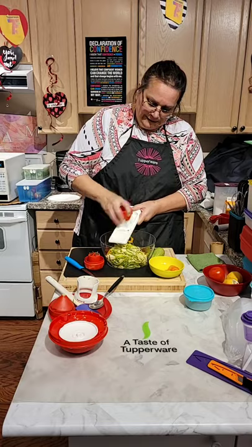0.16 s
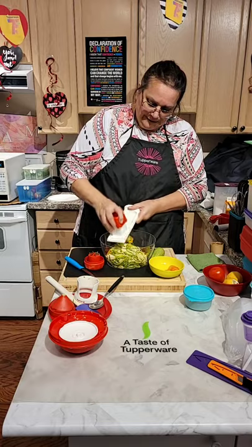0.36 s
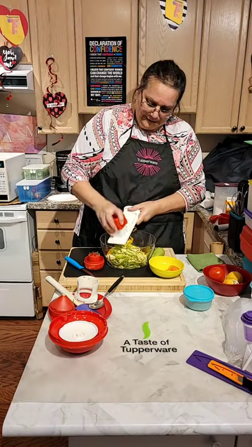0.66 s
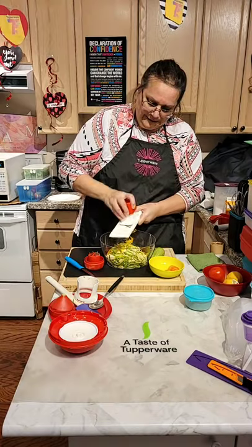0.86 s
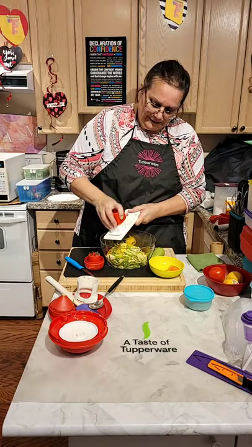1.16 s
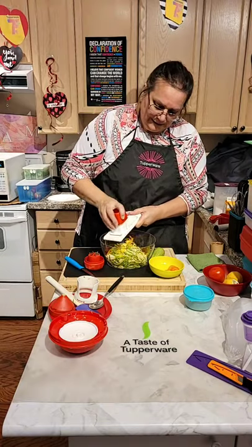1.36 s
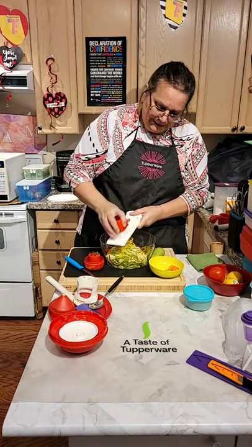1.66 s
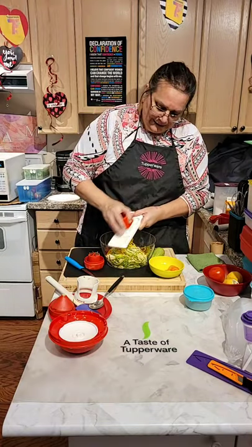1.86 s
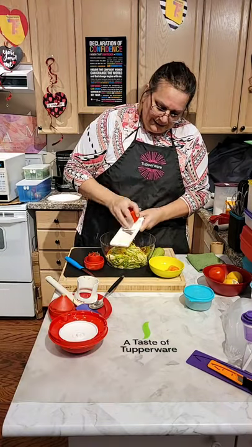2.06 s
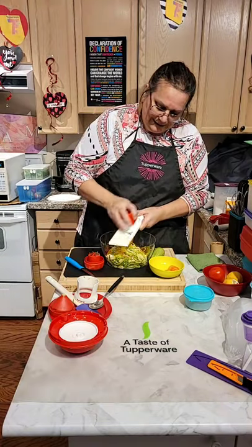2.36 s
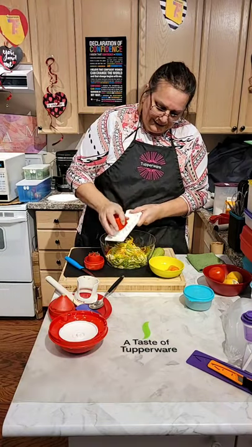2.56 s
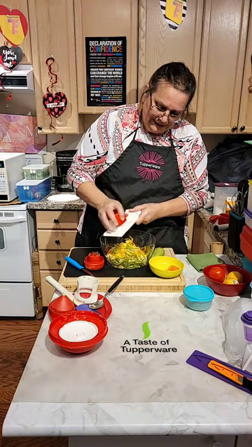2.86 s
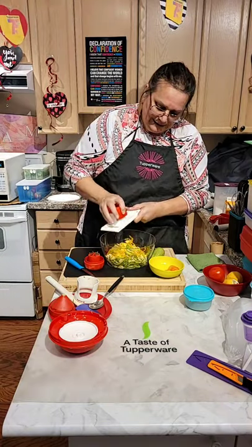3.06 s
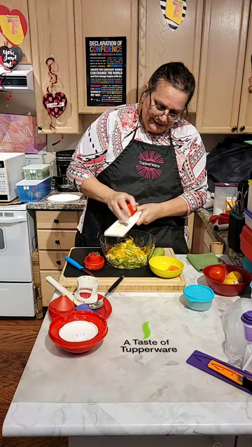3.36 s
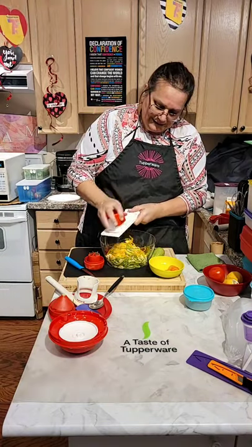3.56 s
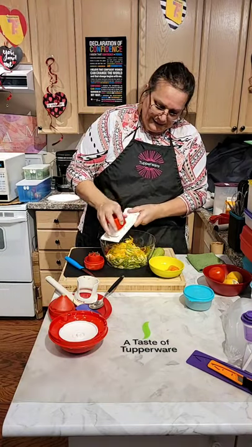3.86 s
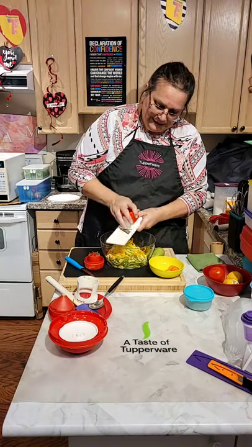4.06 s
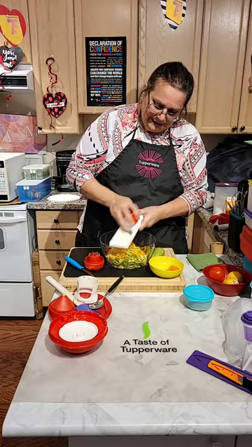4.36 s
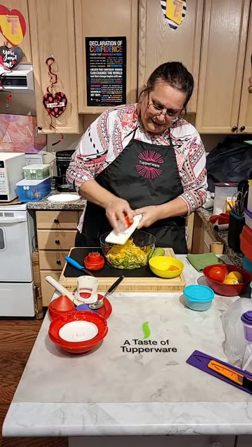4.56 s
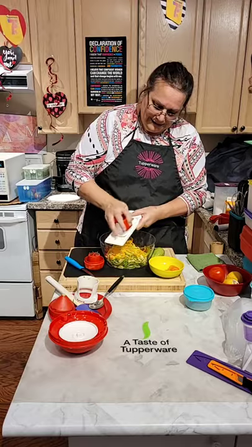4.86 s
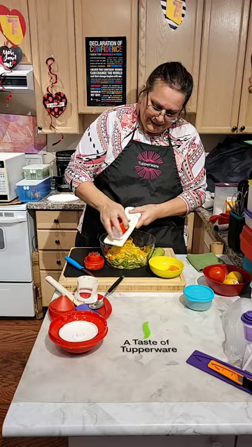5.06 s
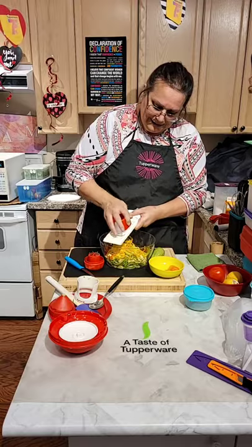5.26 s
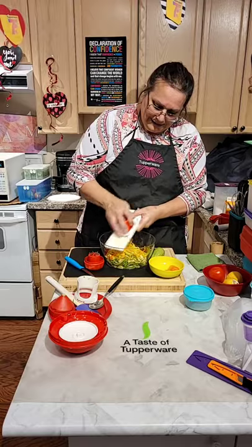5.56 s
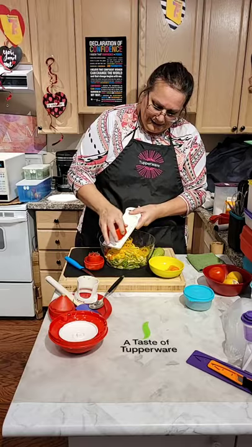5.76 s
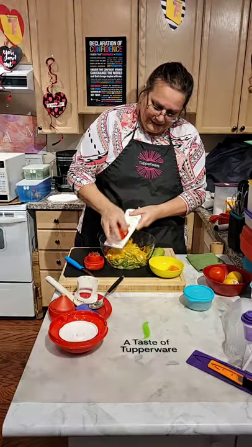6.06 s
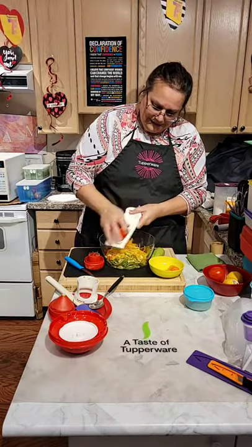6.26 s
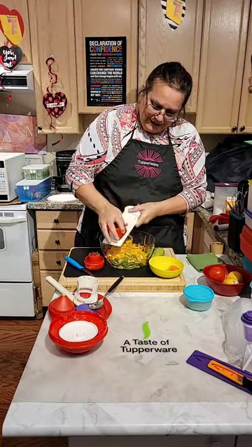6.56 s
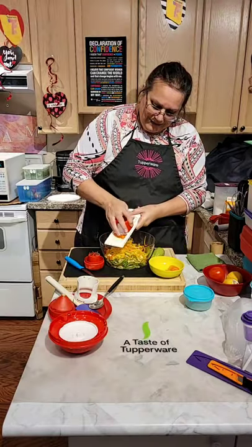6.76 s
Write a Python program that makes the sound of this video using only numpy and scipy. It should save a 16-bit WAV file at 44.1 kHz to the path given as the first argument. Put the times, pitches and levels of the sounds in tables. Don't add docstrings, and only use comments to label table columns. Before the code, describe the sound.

In a small hard kitchen, a hand guard clicks and rasps along a plastic slicer in uneven bursts, with tiny ticks and wet squeaks.

```python
import sys
import numpy as np
from scipy import signal
from scipy.fft import rfft, irfft
from scipy.io import wavfile
from scipy.ndimage import uniform_filter1d

SR = 44100
rng = np.random.default_rng(int(sys.argv[2]) if len(sys.argv) > 2 else 0)


def field_ratio(decibels):
    return 10 ** (np.asarray(decibels, dtype=float) / 20)


def store_wav(level_fs):
    pcm = np.round(np.clip(np.atleast_2d(level_fs), -1, 1) * 32767)
    wavfile.write(sys.argv[1], SR, pcm.T.astype(np.int16))


N = 304710


def evened(x):
    return x / np.sqrt(np.mean(x ** 2) + 1e-20)


def peaked(x):
    return x / abs(x).max()


def read(points, hz):
    f, value = np.transpose(points)
    return np.interp(np.log(hz + 1), np.log(f + 1), value)


def add(mix, s, sound):
    part = mix[round(s * SR):][:len(sound)]
    part += sound[:len(part)]


def play(table, source, places=1):
    mix = np.zeros((places, N))
    for k, (s, *settings) in enumerate(table):
        add(mix[k % places], s, source(*settings))
    return mix


def resonate(x, hz, width):
    return signal.lfilter(*signal.iirpeak(min(hz, SR / 2 - width), hz / width, SR), x)


def steep(x, hz, width):
    return resonate(resonate(x, hz, width), hz, width)


# (frequency [Hz], likeness [0-1])
LIKENESS = [(40, 0.92), (250, 0.26), (500, 0.75), (1000, 0.12), (16000, 0.042)]


def noise(colour, patchy_db):
    hz = np.fft.rfftfreq(1024, 1 / SR)
    a, b, c, d, patches = rng.standard_normal((N // 256 + 5, 513, 5)).T
    patches = uniform_filter1d(patches, size=12, axis=0)
    patches = evened(uniform_filter1d(patches, size=8, axis=1))
    same = np.clip(read(LIKENESS, hz), -1, 1)[:, None]
    left = a + 1j * b
    right = same * left + np.sqrt(1 - same ** 2) * (c + 1j * d)
    z = np.array([left, right]) * field_ratio(read(colour, hz)[:, None] + patchy_db * patches)
    return evened(signal.istft(z, nperseg=1024, noverlap=768)[1][:, :N])


# (frequency [Hz], width [Hz], level [dB])
HUM_LINES = [(49.6, 16, -63), (119.7, 5.1, -62.5), (143.4, 6.9, -59.5), (272.7, 10, -63)]
# (time [s], level [dB])
DRAUGHT = [(0, 11), (.5, 3), (1.45, 9), (1.7, 4), (2.6, 2), (4.3, 0.5), (4.9, -9), (5.75, 5.5), (6.2, -7),
           (6.9, 0)]
# (frequency [Hz], level per Hz [dB])
ROOM_AIR = [(15, -39), (25, -8), (140, -14.5), (250, -3), (373, -8), (850, -18.5), (2000, -26),
            (16000, -58.5)]


def refrigerator():
    lines = np.zeros((2, N))
    for k, (hz, width, db) in enumerate(HUM_LINES):
        p, q = rng.standard_normal((2, N))
        sides = (p + 0.067 * q, p - 0.29 * q)
        line = field_ratio(db) * np.array([evened(steep(x, hz, 2 * width)) for x in sides])
        if k == 0:
            line = line * field_ratio(np.interp(np.arange(N) / SR, *np.transpose(DRAUGHT)))
        lines += line
    waver = evened(uniform_filter1d(rng.standard_normal(N), size=SR // 3))
    motor_hz = 241.4 + 0.48 * waver
    motor = field_ratio(-50 + 0.27 * waver) * np.sin(2 * np.pi * np.cumsum(motor_hz) / SR)
    return motor + lines + field_ratio(-52.5) * noise(ROOM_AIR, patchy_db=-2.8)


# (start [s], length [s], pressure [dB], wetness [dB])
STROKES = [(0.128, 0.16, -36.5, -19.5), (0.289, 0.1, -29.5, -20), (0.407, .14, -36, -15),
           (0.594, 0.12, -34.5, -16), (0.763, 0.094, -36.5, -15.5), (0.896, 0.059, -28.5, -20),
           (0.975, 0.081, -41, -19), (1.39, .12, -38.5, -14.5), (1.552, 0.16, -32.5, -24),
           (1.726, 0.29, -36, -10), (1.903, 0.066, -27, -7.5), (1.994, 0.32, -35, -9.5),
           (2.341, 0.29, -35.5, -16.5), (2.649, .25, -34, -17.5), (3.269, 0.13, -34, -18),
           (3.4, 0.21, -36.5, -17.5), (3.995, 0.081, -35, -14.5), (4.092, 0.19, -32.5, -24),
           (4.283, 0.18, -33, -11.5), (4.57, 0.067, -35.5, -15), (4.68, 0.14, -35.5, -19),
           (4.854, 0.046, -38.5, -10), (5.036, 0.16, -46, -34), (5.15, 0.15, -47.5, -11.5),
           (5.415, 0.1, -45.5, -20), (5.554, 0.18, -30, -21.5), (5.812, 0.17, -34.5, -17),
           (5.94, 0.24, -32.5, -14.5), (6.21, 0.25, -34, -16), (6.487, .2, -36, -13)]
# (start [s], length [s], pressure [dB], wetness [dB])
RESTS = [
    (1.087, 0.29, -56.5, -21),
    (2.904, 0.346, -53, -11),
    (3.6, 0.4, -56, -14.5),
    (4.93, 0.11, -61, -19),
    (5.302, 0.14, -65.5, -19),
    (6.73, 0.34, -56.5, -21),
]


def strokes():
    press_s, press_shape, sag_db, lift_db_per_s = 0.054, 1.16, -4.5, 389
    t = np.arange(0, N / SR + .01, .002)
    sums = 1e-6
    for start, length, pressure_db, wet_db in STROKES + RESTS:
        along = np.clip((t - start) / length, 0, 1)
        lift_db = lift_db_per_s * np.maximum(t - start - length, 0)
        gain = np.clip((t - start) / press_s, 0, 1) ** press_shape
        gain = gain * field_ratio(pressure_db + sag_db * along - lift_db)
        sums = sums + np.array([gain, gain * field_ratio(wet_db), gain * along])
    pressure, wet, progress = sums
    ring_hz = (1360 + 79 * t) * (1 + 0.088 * progress / pressure)
    return (np.interp(np.arange(N) / SR, t, curve) for curve in (pressure, wet, ring_hz))


# (frequency [Hz], width [Hz], level [dB])
SLIDE_MODES = [(670, 1720, 5.5), (2060, 160, -20.5), (4200, 300, -1.5), (6500, 2800, -7)]
# (frequency [Hz], level per Hz [dB])
JUICE_HISS = [(1760, -16), (3000, -1), (4110, -3.5), (7300, -1), (9140, -13), (12400, 1), (15400, -7.5),
              (15800, -40)]


def scrape():
    pressure, wet, ring_hz = strokes()
    slips = rng.standard_normal(N) * field_ratio(3.5 * np.minimum(rng.exponential(1, N), 3.5))
    slips = slips * (rng.random(N) < 900 / SR)
    tremble = evened(resonate(rng.standard_normal(N), 31, 36))
    judder = field_ratio(5.5 * np.tanh(tremble))
    grains = slips * judder
    turn = np.exp(2j * np.pi * np.cumsum(ring_hz) / SR)
    r = np.exp(-np.pi * 320 / SR)
    body = 2 * (turn * signal.lfilter([1 - r], [1, -r], grains / turn)).real
    for hz, width, db in SLIDE_MODES:
        body = body + field_ratio(db) * steep(grains, hz, 2.6 * width)
    hiss = noise(JUICE_HISS, patchy_db=2.0) * judder ** 0.71
    return pressure * field_ratio(-9.5) * evened(body), wet * field_ratio(5.0) * hiss


def contact(seconds):
    u = np.arange(1024) / SR / seconds
    chatter = rng.standard_normal(1024)
    for _ in range(3):
        z = rfft(chatter * u * np.exp(-u))
        chatter = irfft(z / abs(z) ** .8)
    return chatter * np.exp(-u / 8) * np.minimum(u, 1)


def clack(blow_db, plate_hz, upper_hz, hard_db):
    hit = contact(0.001048)
    plate = steep(hit, plate_hz, 590) + 0.39 * steep(hit, 1764, 500)
    plate = plate + 0.22 * steep(hit, 1450, 330) + 0.89 * steep(hit, 2322, 2770)
    upper = 1.16 * resonate(hit, upper_hz, 500) + 0.42 * resonate(hit, 3670, 1800)
    upper = upper + .5 * resonate(hit, 5934, 2960)
    snap = resonate(hit, 11520, 3400)
    ring = plate + field_ratio(hard_db + 12.5) * upper + field_ratio(hard_db + 3.5) * snap
    ring = ring - 1.33 * resonate(ring, 1254, 180)
    return field_ratio(blow_db - 1.0) * peaked(ring)


def blow(s, blow_db, plate_hz, hard_db):
    upper_hz = 3633 + 103 * s + 45 * (hard_db + 15)
    sound = clack(blow_db, plate_hz, upper_hz * (1 + .03 * rng.uniform(-0.74, 1)), hard_db)
    patched = sound
    for hz in np.geomspace(1400, 8000, 7) * rng.uniform(.9, 1.1, 7):
        patched = patched + (field_ratio(4 * rng.uniform(-1.07, 1)) - 1) * resonate(sound, hz, .16 * hz)
    return abs(sound).max() * peaked(patched)


# (time [s], blow [dB], plate ring [Hz], hardness [dB])
CLACKS = [(0.212, -6, 1640, -14.5), (0.372, -7.5, 1480, -16.5), (0.676, -11, 1400, -19),
          (0.97, -5, 1490, -15), (1.64, -3.5, 1800, -14.5), (1.955, -5, 2150, -14),
          (2.105, -9.5, 1880, -16.5), (2.269, -14.5, 2250, -22.5), (2.436, -8, 2470, -14.5),
          (2.577, -8, 2590, -16.5), (2.742, -5, 1510, -14), (2.918, -17.5, 2100, -18),
          (3.358, -8, 1770, -12), (3.526, -10, 1860, -17), (4.083, -6.5, 1600, -13.5),
          (4.215, -4, 2230, -15), (4.355, -0.5, 1670, -14), (4.665, -9, 1850, -18),
          (4.799, -12.5, 2800, -14.5), (5.137, -10, 2330, -16), (5.49, -11.5, 1450, -18.5),
          (5.582, -21, 1490, -25), (5.636, -5, 2260, -9), (5.772, -6.5, 2330, -13.5),
          (5.9225, -2.5, 1860, -9), (6.05, -6.5, 1900, -16), (6.206, -8, 1820, -18.5),
          (6.319, -3.5, 2050, -15.5), (6.485, -12.5, 1870, -17.5), (6.598, -2.5, 2100, -22.5)]


def clacks():
    hits = np.zeros((3, N))
    for k, row in enumerate(CLACKS):
        add(hits[k % 3], row[0], blow(*row))
    return hits


def knock(blow_db, frame_hz):
    hit = contact(0.000698)
    spot = field_ratio(7.5 * rng.uniform(-1.35, 1, 3))
    modes = steep(hit, frame_hz, 323) + 0.29 * spot[0] * steep(hit, 390, 110)
    modes = modes + 0.54 * spot[1] * steep(hit, 667, 333) + 0.22 * spot[2] * steep(hit, 870, 210)
    return field_ratio(blow_db - 1.5) * peaked(signal.lfilter(*signal.butter(3, 320 / SR * 2, "high"), modes))


# (time [s], level [dB], frame mode [Hz])
KNOCKS = [(0.212, -19.5, 424), (0.372, -19, 486), (0.676, -20.5, 495), (0.97, -19, 484),
          (1.639, -15.5, 430), (1.956, -20, 477), (2.105, -18.5, 594), (2.268, -24, 835),
          (2.4365, -20, 540), (2.578, -19, 450), (2.741, -19, 470), (2.919, -35, 345), (3.359, -18.5, 407),
          (3.526, -20.5, 445), (4.082, -17.5, 473), (4.2145, -16.5, 468), (4.354, -21.5, 410),
          (4.665, -24, 610), (4.801, -20.5, 402), (5.136, -24, 386), (5.491, -33, 428), (5.582, -24.5, 695),
          (5.637, -18, 440), (5.772, -17.5, 457), (5.922, -20.5, 670), (6.049, -18, 375),
          (6.206, -25.5, 647), (6.319, -17.5, 480), (6.486, -30, 675), (6.599, -19, 480)]


def knocks():
    return play(KNOCKS, knock)[0]


def tick(blow_db, ring_hz):
    hit = contact(0.000874)
    ring = peaked(resonate(hit, ring_hz, 0.13 * ring_hz))
    crack = peaked(resonate(hit, 2500, 2900))
    return field_ratio(blow_db + 6.5) * peaked(ring + 0.49 * crack)


# (time [s], blow [dB], ring [Hz])
TICKS = [(0.314, -40, 400), (0.466, -40, 3500), (0.529, -42, 1990), (0.614, -41, 1530), (0.813, -42, 1540),
         (0.941, -34, 1830), (1.302, -54, 423), (1.404, -42, 1710), (1.572, -42, 1540), (1.781, -36, 1500),
         (2.404, -41, 2320), (2.516, -34, 1680), (3.133, -45, 600), (3.278, -50, 1500), (3.892, -52, 2080),
         (4.016, -45, 2130), (4.6, -43.5, 2000), (4.751, -34, 2200), (4.888, -38, 1900),
         (5.047, -45.5, 1500), (5.241, -46.5, 385), (5.408, -50.5, 581), (5.431, -42, 2240),
         (5.75, -36, 2040), (5.879, -39, 2050), (6.012, -36, 2130), (6.273, -39, 1900),
         (6.555, -30.5, 2140), (6.699, -33, 1980), (6.846, -47.5, 390)]
# (time [s], blow [dB], ring [Hz])
GRAZES = [
    (0.364, -27.5, 2300),
    (4.347, -42, 1480),
    (4.79, -32, 1740),
]


def ticks():
    return play(TICKS + GRAZES, tick, places=3)


def squeak(seconds, start_hz, end_hz, db):
    hz = np.linspace(start_hz, end_hz, round(seconds * SR))
    hz = hz + 40 * evened(uniform_filter1d(rng.standard_normal(len(hz)), size=150))
    grip = abs(evened(uniform_filter1d(rng.standard_normal(len(hz)), size=120)))
    tone = np.sin(2 * np.pi * np.cumsum(hz) / SR)
    return field_ratio(db + 4) * grip * tone * signal.windows.tukey(len(hz), .6)


# (time [s], length [s], start pitch [Hz], end pitch [Hz], level [dB])
SQUEAKS = [
    (0.41, 0.038, 3860, 3980, -56),
    (.452, 0.022, 3700, 3590, -46),
    (0.496, 0.042, 3960, 4170, -53),
    (1.7, 0.054, 4160, 4200, -66),
    (1.878, 0.008, 1970, 1940, -44),
    (3.888, 0.032, 2115, 2150, -59),
    (5.728, 0.025, 3970, 4020, -45),
    (5.784, 0.016, 4190, 4400, -31),
]


def squeaks():
    return play(SQUEAKS, squeak)[0]


# (time [s], level [dB], pitch [Hz], t60 [s])
THUMPS = [
    (1.939, -24, 213, 0.071),
    (1.944, -21, 342, 0.034),
    (1.948, -19, 102, 0.063),
    (4.203, -40, 126, 0.24),
    (4.258, -43, 80.5, 0.12),
]


def thump(db, hz, t60):
    t = np.arange(6000) / SR
    return field_ratio(db - 60 * t / t60) * np.sin(2 * np.pi * hz * t) * np.minimum(t / 0.0036, 1)


def thumps():
    return play(THUMPS, thump)[0]


# (frequency [Hz], t60 [s])
ROOM_T60 = [(300, 0.07), (500, 0.13), (800, 0.19), (2100, 0.2), (5500, 0.22), (14000, 0.15)]
# (delay [ms], gain [ratio])
ECHOES = [
    [(1.5, .4), (2.9, -.3), (6.3, .3), (8.4, -.14), (12.2, .16)],
    [(1.2, -.45), (2.4, .35), (3.5, .25), (6.9, .28), (13.1, -.15)],
]


def kitchen(x, tail_db, echo_db=0):
    taps = np.zeros((2, SR // 2))
    at = np.arange(160, SR // 2 - 20, 10)
    at = at + rng.integers(0, 10, (2, len(at)))
    np.put_along_axis(taps, at, rng.choice([-1., 1.], at.shape), 1)
    hz, t, z = signal.stft(taps, SR, nperseg=256)
    tail = signal.istft(z * field_ratio(-60 * t / read(ROOM_T60, hz)[:, None]), SR, nperseg=256)[1]
    tail *= np.clip(np.arange(tail.shape[1]) / SR / 0.0017, 0, 1)
    response = field_ratio(tail_db) * tail / np.linalg.norm(tail[0])
    response[:, 0] += 1
    for side, echoes in zip(response, ECHOES):
        for ms, gain in echoes:
            add(side, ms / 1000, np.array([gain * field_ratio(echo_db)]))
    bass = signal.filtfilt(*signal.butter(2, 420 / SR * 2), response[0] - response[1], padlen=0)
    return signal.fftconvolve(x[None], response + [-bass / 2, bass / 2], axes=1)[:, :N]


def scene():
    hum = refrigerator()
    body, hiss = scrape()
    struck = sum(kitchen(place, tail_db=0.5) for place in clacks() + ticks())
    struck += kitchen(knocks() + squeaks(), tail_db=-2.5, echo_db=-3)
    return struck + kitchen(body, tail_db=9) * field_ratio(-6) + hiss + thumps() + hum


def roll_off(x):
    return signal.sosfilt(signal.butter(12, 16810, fs=SR, output="sos"), x)


def record(dry):
    rounded = dry / (1 + abs(dry / .8) ** 8) ** (1 / 8)
    edge_hz, edge_gain = [0, 15300, 15800, 16500, 16800, SR / 2], [1, 1, .12, .08, 0, 0]
    edge = signal.firwin2(511, edge_hz, edge_gain, window=("kaiser", 9), fs=SR)
    return roll_off(1.164 * signal.oaconvolve(rounded, edge[None], "same"))


dry = scene()
out = record(dry)
store_wav(out)
```